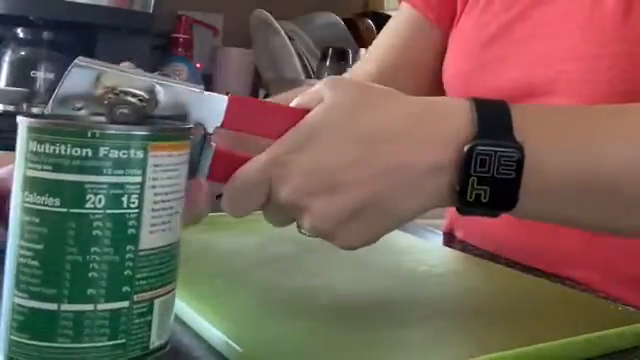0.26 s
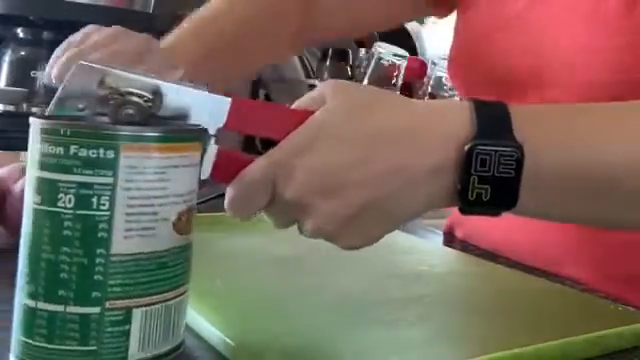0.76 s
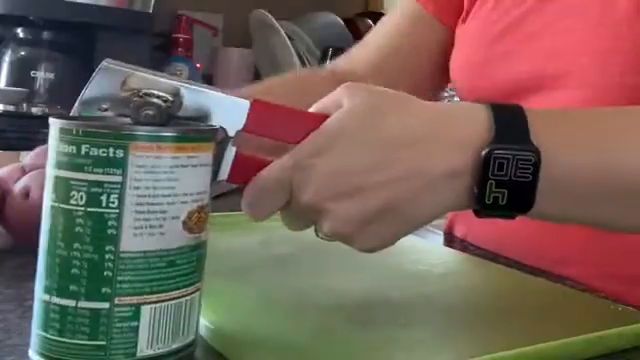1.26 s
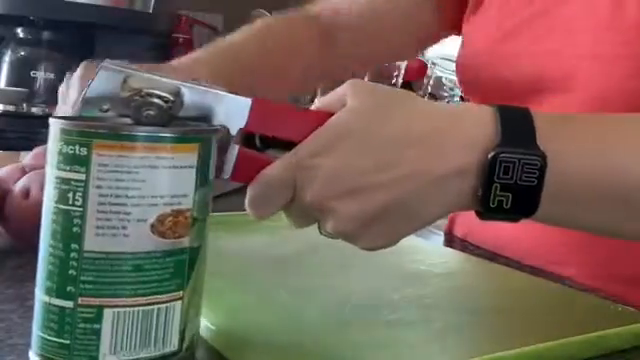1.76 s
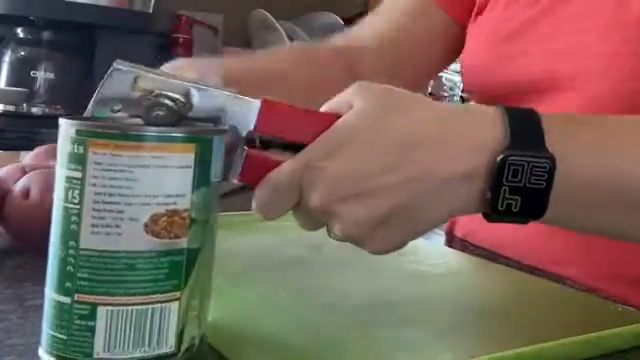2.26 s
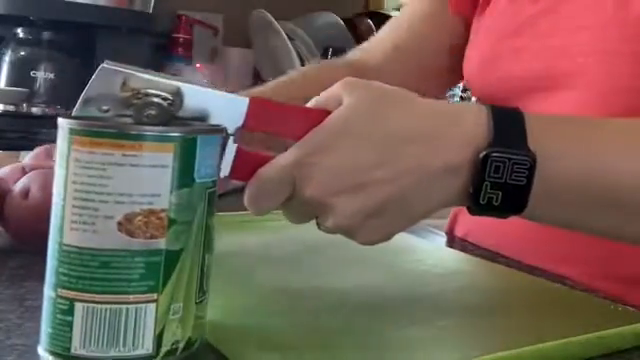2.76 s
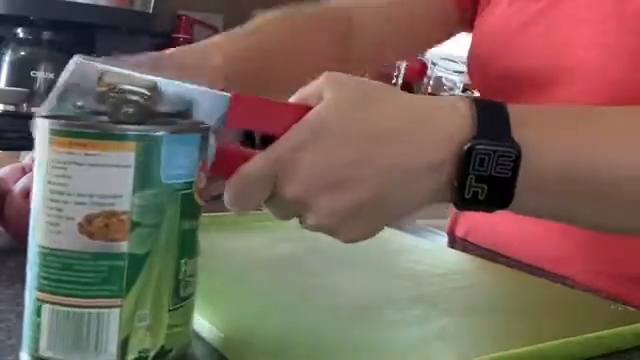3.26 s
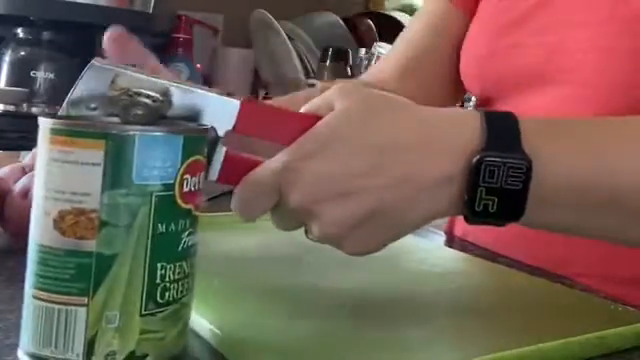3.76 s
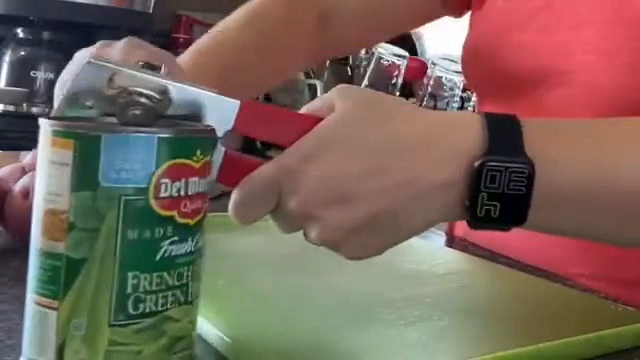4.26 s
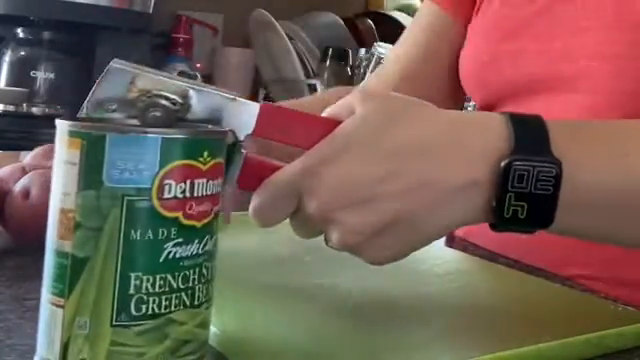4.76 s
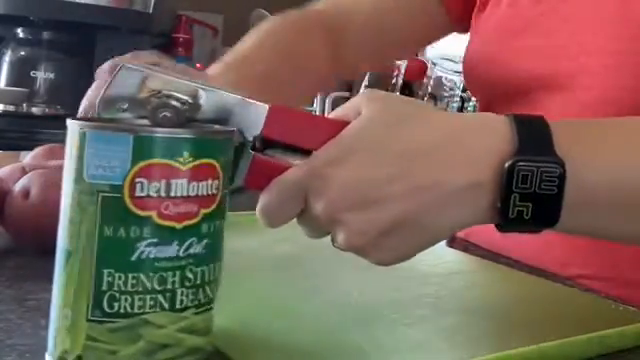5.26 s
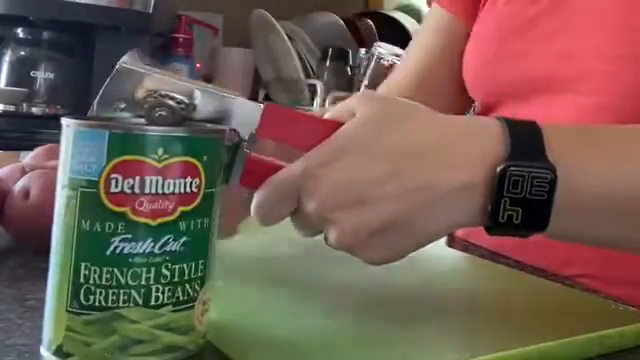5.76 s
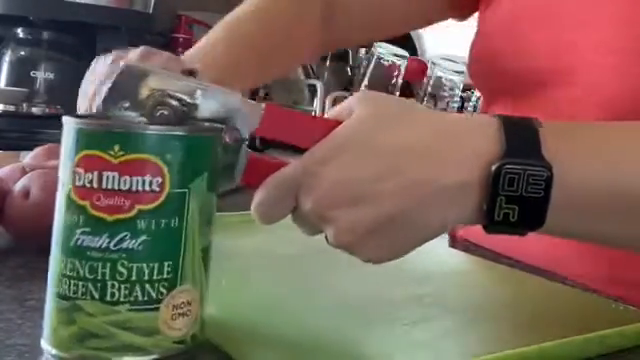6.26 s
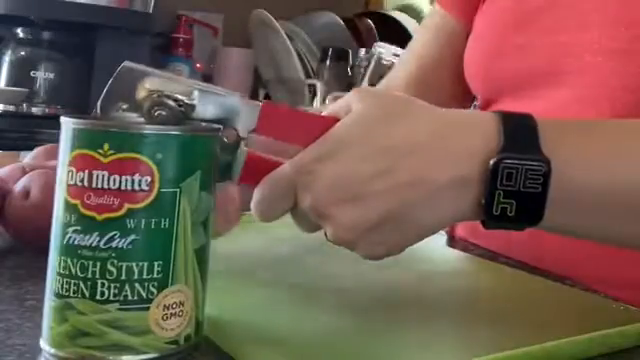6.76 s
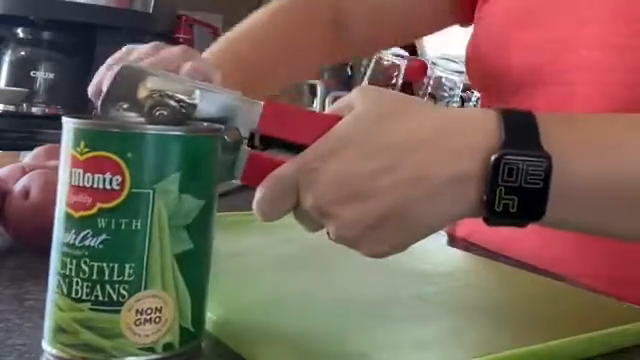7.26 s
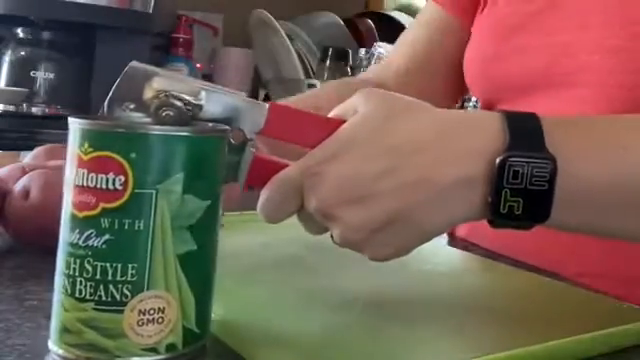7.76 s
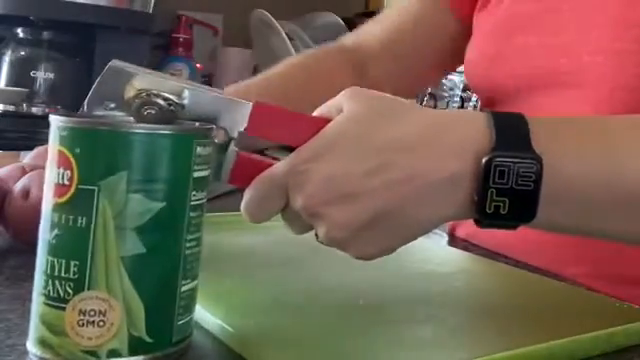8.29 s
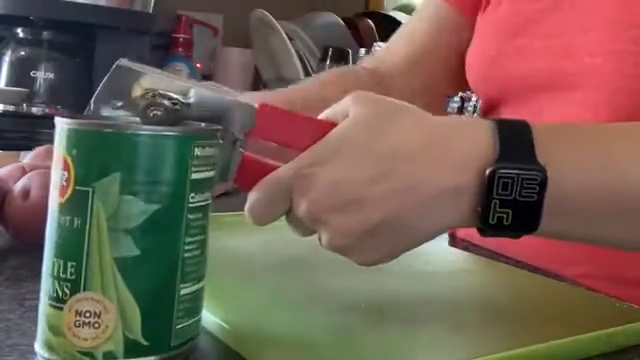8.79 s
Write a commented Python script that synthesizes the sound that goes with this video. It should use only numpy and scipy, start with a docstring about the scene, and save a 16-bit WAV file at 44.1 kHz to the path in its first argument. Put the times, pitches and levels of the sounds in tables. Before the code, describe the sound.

Close-up of a manual can opener working a tin's rim: gritty scraping, clustered tooth ticks, knocks on the counter, quiet kitchen hum behind.

```python
"""A fridge hums and a hand-held opener rubs lightly on a full steel can, standing on a kitchen counter by a phone.
Then each wrist stroke scrapes the rim: noisy slips keep the modes of counter, can and opener ringing.
The rocking can thuds into the counter, feed-wheel teeth tick through the can's modes, and the lid snaps
as short noise bursts. Decaying noise gives the room; the phone's two ports hear the can by different paths."""
import sys
import numpy as np
from scipy import signal
from scipy.fft import rfft, irfft
from scipy.io import wavfile
from scipy.ndimage import uniform_filter1d

SR = 44100
rng = np.random.default_rng(int(sys.argv[2]) if len(sys.argv) > 2 else 0)


def wrap_up_sound(samples):
    """Save the sound to the file named by the first command line argument, as 16-bit audio."""
    columns = np.atleast_2d(samples).T
    # keep every value between -1 and 1, then stretch to whole-number steps
    tamed = np.clip(columns, -1, 1)
    steps = np.round(tamed * 32767).astype(np.int16)
    wavfile.write(sys.argv[1], SR, steps)


N = 398223
FREQ = np.fft.rfftfreq(N, 1 / SR)

# Modes share three columns: pitch_hz [Hz], level_db [dB, relative], t60_s [s, before any damping by the grip]
# bending modes of the counter top
COUNTER_MODES = [(128.1, -2, 0.071), (171.4, -0.5, 0.089), (202.4, 0.5, 0.067), (240.9, -3, 0.083),
                 (290, -8, 0.043), (365, -12, 0.068), (424, -7, 0.1), (479.7, 1.5, 0.054),
                 (540, -6.5, 0.022)]
# the counter's deep, slow shake
SHAKE_MODES = [(51.7, 4.5, 0.55), (60.2, 10.5, 0.24), (74.4, -13, 0.11)]
# the full can's wall and rim
CAN_MODES = [(653.4, 7, 0.043), (750.4, 5.5, 0.039), (850, -1.5, 0.039), (926, 4, 0.024),
             (1164.4, 0, 0.058), (1324, -3, 0.04), (1460, -7, 0.03), (1580, -8.5, 0.036),
             (1613, 1.5, 0.088), (1737, -4.5, 0.14), (1870, -9, 0.095), (2060, -13.5, 0.063),
             (2330, -12.5, .05), (2820, -20, 0.088), (3030, -16.5, 0.15)]
# the opener's steel
OPENER_MODES = [(3260, 0.5, 0.09), (3310, -2.5, 0.1), (3380, -3, 0.08), (3680, -1.5, 0.057),
                (3930, -3.5, .035), (4300, -4, .03), (5000, -2, .06), (6050, -5, .05), (8200, -1, 0.052),
                (9600, -3, .04)]


def undb(db):
    """Decibels to amplitude gain."""
    return 10 ** (np.asarray(db) / 20)


def unit(x):
    """Scales a signal to rms 1."""
    return x / np.sqrt(np.mean(x ** 2))


def shaped(x, table):
    """Colours a signal by (Hz, dB) points; rms 1."""
    hz, db = np.transpose(table)
    gain = undb(np.interp(np.log(FREQ + 1), np.log(hz), db))
    return unit(irfft(rfft(x) * gain, N))


def band(x, lo_hz, hi_hz, order=2):
    """Keeps the sound between two frequencies."""
    edges = [lo_hz, min(hi_hz, .45 * SR)]
    return signal.sosfilt(signal.butter(order, edges, "band", fs=SR, output="sos"), x)


def walk(rate):
    """Random levels held 1 / rate s and smoothed twice; rms near 1."""
    k = int(SR / rate)
    steps = np.repeat(rng.standard_normal(N // k + 1), k)
    return unit(uniform_filter1d(uniform_filter1d(steps, k), k)[:N])


def ring(modes, centre_hz, octaves, scatter_db, rise_cycles):
    """One blow: the modes near the struck spot's centre speak loudest, low ones build later; peak 1."""
    hz, db, t60 = (c[:, None] for c in np.transpose(modes))
    t = np.arange(int(min(t60.max(), 1 / 3) * SR)) / SR
    chance = rng.standard_normal((len(modes), 3))
    distance = np.log2(hz / centre_hz) / octaves
    gain = undb(db + scatter_db * chance[:, :1] - 6 * distance ** 2)
    turn = 2 * np.pi * hz * (1 + .007 * chance[:, 1:2]) * t
    # each mode has a close, weaker twin, so the ring beats roughly
    pair = np.sin(turn) + .6 * np.sin(turn * (1 + .02 * chance[:, 2:]))
    rise = (1 - np.exp(-t * hz / rise_cycles)) ** 2
    wave = (gain * pair * undb(-60 * t / t60) * rise).sum(axis=0)
    return wave / np.abs(wave).max()


def crack(lo_hz, hi_hz, t60):
    """A short burst of noise at the contact; peak 1."""
    t = np.arange(SR // 20) / SR
    burst = rng.standard_normal(len(t)) * undb(-60 * t / t60) * (1 - np.exp(-t / 0.00072))
    wave = band(burst, lo_hz, hi_hz, order=3)
    return wave / np.abs(wave).max()


def add(out, s, wave):
    """Lays a wave into the track at s seconds."""
    i = int(s * SR)
    out[i:i + len(wave)] += wave[:len(out) - i]


def rubbed(modes, rate, spread_db, grain_db, push_s, damp):
    """Uneven little slips, over a bed of noise, keep the modes ringing, damped by the grip; rms 1."""
    struck = rng.random(N) < rate / SR
    strength = undb(spread_db * np.clip(rng.standard_normal(N), -2, 2))
    slips = struck * strength * np.sign(rng.standard_normal(N))
    push = undb(grain_db) * unit(slips) + rng.standard_normal(N)
    drive = uniform_filter1d(push, 1 + int(push_s * SR))
    out = 0
    for hz, db, t60 in modes:
        r = undb(-60 * damp / (t60 * SR))
        angle = 2 * np.pi * hz / SR
        ringing = signal.lfilter([1], [1, -2 * r * np.cos(angle), r * r], drive)
        # the rubbed spot travels, so each mode swells and fades on its own
        out = out + undb(db + 2.3 * walk(6)) * np.sin(angle) * ringing
    return unit(out)


def background():
    """Slightly wavering fridge hum and a thin can ring, over dull air noise spread between the two ports."""
    # steady faint tones: motor hum of the fridge, plus the can's thin 1610 Hz ring;
    # columns: pitch_hz [Hz], level_db [dB rms, before the wavering]
    steady_tones = [(59.5, -50), (179, -54.5), (215, -56.5), (240, -63.5), (297, -57), (324, -71),
                    (349, -74.5), (431, -74), (645, -79), (1610, -90.5), (4050, -99)]
    # colour of the room's air noise; columns: pitch_hz [Hz], level_db [dB per Hz, relative]
    air_colour = [(18, -27.5), (30, -13.5), (68, -9.5), (133, -14), (181, -13.5), (304, -3), (786, -35.5),
                  (2140, -66), (9520, -60.5), (14000, -79.5)]
    air_db = -56.5
    t = np.arange(N) / SR
    tones = 0
    for hz, db in steady_tones:
        level = np.sqrt(2) * undb(db + 0.38 * walk(6.5))
        tones = tones + level * np.sin(2 * np.pi * hz * t + 0.8 * walk(2.3))
    mid, side = (shaped(rng.standard_normal(N), air_colour) for _ in range(2))
    return tones + undb(air_db) * (mid + 0.93 * side * np.array([[1], [-1]]))


def effort(column):
    """Gain of one rubbed layer: each stroke bites, swells to its hardest moment, eases and lets go."""
    # wrist strokes and short regrips; columns: start_s [s], hardest_s [s], end_s [s], then levels at the
    # hardest moment: rumble_db [dB, counter], scrape_db [dB, rim], hiss_db [dB, cutter]
    strokes = [(0.01, .03, 0.11, -47, -61.5, -90), (0.151, 0.193, 0.24, -33, -55.5, -75),
               (0.26, 0.5, 0.67, -35, -47, -62), (0.72, 0.798, 0.87, -46, -54.5, -68.5),
               (0.971, 1.055, 1.26, -40.5, -57, -77.5), (1.178, 1.426, 1.504, -34.5, -44, -60),
               (1.52, 1.56, 1.8, -55, -65, -92.5), (1.837, 1.886, 2.03, -44, -60.5, -82.5),
               (2.078, 2.332, 2.5, -36, -47.5, -63), (2.497, 2.547, 2.86, -49.5, -58, -77.5),
               (2.832, 2.852, 2.99, -46.5, -57.5, -74.5), (3.014, 3.178, 3.43, -35.5, -47, -60),
               (3.39, 3.41, 3.7, -40, -55, -75), (3.763, 3.845, 4.01, -40, -53, -70),
               (3.923, 4.104, 4.34, -37.5, -48.5, -63), (4.265, 4.384, 4.42, -38, -51, -67.5),
               (4.928, 5.044, 5.24, -36, -49, -64), (5.086, 5.22, 5.32, -33, -45.5, -59),
               (5.3, 5.32, 5.5, -50, -59.5, -78), (5.85, 5.878, 6.2, -34, -50, -65.5),
               (5.97, 6.027, 6.365, -37.5, -49.5, -60.5), (6.385, 6.44, 6.5, -41.5, -57, -69),
               (6.692, 6.7, 6.75, -45, -58, -77), (6.765, 7.006, 7.18, -32, -49.5, -61.5),
               (7.517, 7.57, 7.62, -43, -59, -78.5), (7.635, 7.693, 7.73, -45, -57.5, -72.5),
               (7.713, 7.764, 7.98, -38.5, -46, -58.5), (7.815, 7.91, 8.14, -41, -46.5, -64),
               (8.46, 8.47, 8.56, -44.5, -56.5, -71.5), (8.573, 8.716, 9.15, -43, -54.5, -69),
               (8.96, 9.031, 9.8, -39, -53, -75)]
    grip_s, let_go_s = 0.05, 0.07
    # rumble, scrape and hiss while the hand only holds the opener
    rest_db = (-54.5, -76.5, -89.5)[column]
    # the same three at a stroke's start and end, relative to its hardest moment
    bite_db, ease_db = (-9, -7, -10.5)[column], (-9, -12.5, -14)[column]
    t = np.arange(N) / SR
    gain = np.full(N, undb(rest_db))
    for start, hardest, end, *db in strokes:
        times = [start - grip_s, start, hardest, end, end + let_go_s]
        shape_db = np.interp(t, times, [-30, bite_db, 0, ease_db, -30])
        gripping = (t > times[0]) * (t < times[-1])
        gain = np.maximum(gain, undb(db[column] + shape_db) * gripping)
    return gain


def turning():
    """Wrist effort rubs counter, can and cutter without pause, keeping their modes ringing under noise."""
    # colour of the cutter's hiss; columns: pitch_hz [Hz], level_db [dB per Hz, relative]
    hiss_colour = [(1500, -24), (2500, -3.5), (3500, -11.5), (5000, -7), (6200, -9.5), (7400, -17.5),
                   (8100, -6), (9000, -10), (9800, -8.5), (11000, -12), (13000, -7), (14500, -30.5)]
    sway_s, sway_db, sway_rest_db = 0.17, -4.5, -58.5
    firm_db, brighten = -46.5, 0.34  # scrape level of reference brightness; how fast the highs follow effort
    rumble, scrape, hiss = (effort(column) for column in range(3))

    # the counter's sway follows a smoothed rumble
    sway = undb(sway_db) * uniform_filter1d(rumble, int(sway_s * SR)) + undb(sway_rest_db)
    shaking = sway * rubbed(SHAKE_MODES, 30, spread_db=3, grain_db=-3, push_s=.004, damp=1)
    counter = rubbed(COUNTER_MODES, 70, spread_db=6.0, grain_db=1.0, push_s=0.0011, damp=1.3)
    rumbling = rumble * undb(2 * walk(25)) * counter

    grit = undb(2.62 * walk(44) + 1.8 * walk(250))  # the cutter catches and tears unevenly
    burrs = unit(band(rng.standard_normal(N) * undb(5 * walk(400)), 460, 2700))
    low = [m for m in CAN_MODES if m[0] < 1400]
    high = [m for m in CAN_MODES if m[0] >= 1400]
    low_can = rubbed(low, 220, spread_db=4.5, grain_db=11.0, push_s=.0002, damp=1.4)
    high_can = rubbed(high, 350, spread_db=5.0, grain_db=11, push_s=.0001, damp=1.0)
    # a light scrape is duller
    bright = undb(-6) * (scrape / undb(firm_db)) ** brighten
    scraping = scrape * grit * (low_can + bright * high_can + undb(-11.5) * burrs)

    # the opener's arm rattles more once the lid hangs loose, from 8.3 s
    rattle_db = np.where(np.arange(N) / SR > 8.3, 0, -5.5)
    arm = rubbed(OPENER_MODES, 400, spread_db=4, grain_db=4, push_s=.00002, damp=2)
    steel = shaped(rng.standard_normal(N), hiss_colour) + undb(rattle_db) * arm
    hissing = hiss * np.sqrt(grit) * undb(2.0 * walk(60)) * steel
    return shaking + rumbling + scraping + hissing


def thuds():
    """The rocking can strikes the counter: a dry contact, then bending waves and a late, deep shake."""
    # blows on the counter; columns: start_s [s], level_db [dB peak of the main blow], pitch_hz [Hz, centre]
    counter_blows = [(.184, -21.5, 164), (.301, -23, 133), (0.511, -25.5, 189), (0.603, -12, 171),
                     (.834, -31.5, 186), (1.041, -23, 136), (1.352, -18.5, 196.6), (1.394, -16.5, 208.9),
                     (2.177, -24, 237), (2.308, -19.5, 150), (2.411, -17, 134), (2.573, -23.5, 194),
                     (2.642, -30, 133.9), (2.804, -29, 198), (3.091, -24.5, 273), (3.123, -21.5, 199),
                     (3.15, -20.5, 173), (3.382, -10, 161.5), (3.66, -33.5, 180), (3.73, -26.5, 153),
                     (3.913, -31, 194), (3.944, -24, 170), (4.026, -21, 177), (4.075, -25, 190),
                     (4.14, -22, 205), (4.284, -12.5, 258), (4.816, -23, 172.1), (4.963, -16.5, 149),
                     (5.194, -20, 180), (5.777, -22, 271), (5.851, -16, 168), (5.952, -27, 136),
                     (5.998, -24.5, 144), (6.228, -26, 188), (6.381, -18.5, 197), (6.682, -30, 230),
                     (6.769, -18.5, 249.9), (6.862, -20.5, 257), (6.909, -21.5, 184.4), (6.948, -19, 250),
                     (7.007, -16.5, 201), (7.054, -17.5, 203), (7.097, -17.5, 228), (7.516, -26.5, 131),
                     (7.63, -28.5, 177), (7.73, -27, 250), (7.978, -27.5, 134.4), (8.432, -29.5, 146),
                     (8.577, -14, 251)]
    thump_t60_s = 0.031  # the dead blow, as strong as the counter's ring
    contact_db, deep_db = -23, -18  # relative to the main blow
    out = np.zeros(N)
    for s, db, hz in counter_blows:
        blow = ring(COUNTER_MODES, hz, octaves=0.56, scatter_db=4.5, rise_cycles=0.67)
        thump = ring([(hz, 0, thump_t60_s)], hz, octaves=1, scatter_db=0, rise_cycles=.3)
        add(blow, .001, thump)
        shake = ring(SHAKE_MODES, 60, octaves=1.5, scatter_db=3, rise_cycles=.4)
        add(out, s + 0.0019, undb(db) * blow / np.abs(blow).max())
        add(out, s, undb(db + contact_db) * crack(500, 2500, 0.037))
        add(out, s + .006, undb(db + deep_db) * shake)
    return out


def ticks():
    """Each tooth slips off the rim, rings can, lid and opener and spits a little treble."""
    # feed-wheel teeth; columns: start_s [s], level_db [dB, reference for body parts], pitch_hz [Hz, centre],
    # treble_db [dB peak of the highest burst]
    teeth = [(.294, -35, 774, -50.5), (.371, -30.5, 920, -45.5), (.424, -30.5, 600, -44),
             (.48, -24.5, 650, -47), (0.528, -25.5, 690, -42.5), (.582, -28.5, 770, -71),
             (0.604, -19, 870, -46.5), (1.054, -33.5, 726, -77), (1.194, -32, 860, -43.5),
             (1.269, -28.5, 852, -38.5), (1.327, -29.5, 1210, -36), (1.384, -26, 731, -37.5),
             (1.41, -26.5, 763, -48), (1.445, -28.5, 880, -43), (2.081, -36.5, 770, -51.5),
             (2.138, -36.5, 810, -50), (2.167, -33.5, 870, -47.5), (2.231, -37.5, 870, -46),
             (2.282, -31.5, 850, -50), (2.301, -27.5, 680, -40), (2.389, -31.5, 860, -51.5),
             (2.41, -20, 810, -44), (3.062, -31, 850, -57.5), (3.114, -25, 1210, -38),
             (3.157, -21.5, 910, -43.5), (3.205, -25, 1170, -36.5), (3.26, -25.5, 930, -45.5),
             (3.384, -12, 670, -37.5), (3.73, -47, 660, -77), (3.8, -47.5, 860, -66),
             (3.852, -41.5, 1031, -57), (3.942, -36, 730, -62), (4.073, -41.5, 785, -57.5),
             (4.093, -34.5, 870, -53.5), (4.144, -37, 795, -51.5), (4.283, -21.5, 1168, -46),
             (4.82, -34.5, 513, -66), (4.962, -30, 665, -51.5), (5.029, -30.5, 960, -40.5),
             (5.079, -37, 620, -53), (5.092, -29, 882, -38.5), (5.144, -29.5, 1195, -36.5),
             (5.192, -23, 1187, -34), (5.227, -26, 635, -34), (5.777, -28, 632, -75.5),
             (5.852, -21, 810, -35), (6.03, -27.5, 1185, -39.5), (6.068, -28, 1235, -61.5),
             (6.094, -47, 1170, -48), (6.24, -35, 875, -55), (6.38, -30, 700, -62.5),
             (6.43, -32.5, 1306, -41.5), (6.684, -40.5, 690, -67), (6.768, -33.5, 657, -53),
             (6.799, -25.5, 1307, -57.5), (6.851, -33.5, 690, -46.5), (6.908, -25.5, 1005, -34.5),
             (6.955, -24.5, 684, -29), (7.004, -19, 695, -34.5), (7.047, -23.5, 1098, -42),
             (7.098, -18.5, 830, -42), (7.714, -28, 1320, -41), (7.75, -29.5, 1543, -39),
             (7.893, -40, 1189, -48.5), (7.957, -43, 915, -44), (8.46, -41.5, 1610, -46),
             (8.576, -28, 820, -55), (8.656, -35, 1080, -50.5), (8.698, -34.5, 1640, -41),
             (8.756, -33.5, 990, -44), (8.848, -31.5, 770, -40), (8.997, -35, 1130, -47),
             (9.025, -30.5, 1320, -40.5)]
    # higher-centred ticks carry more of the lid's clear tone and less noise
    lid_hz, lid_tone_db, crack_db = (870, 1240), (-17.5, -4.5), (-6, -15)
    lid_t60_s = 0.043
    free_s, held_db = (5.3, 6.0), -4  # the lid's tone is held down until it is cut half free
    can_db = -3  # can ring, relative to level_db
    grind_db, ping_db = 2.5, -13.5  # low treble and opener ring, relative to treble_db
    out = np.zeros(N)
    for s, db, hz, treble_db in teeth:
        lid_db = np.interp(hz, lid_hz, lid_tone_db) + np.interp(s, free_s, [held_db, 0])
        # a stronger lid tone leaves the can a weaker ring
        can_level_db = db + can_db - 0.3 * (lid_db - lid_tone_db[0])
        can = ring(CAN_MODES, hz, octaves=0.46, scatter_db=2.5, rise_cycles=0.45)
        lid = ring([(hz, 0, lid_t60_s)], hz, octaves=1, scatter_db=0, rise_cycles=.7)
        opener = ring(OPENER_MODES, 3600, octaves=0.45, scatter_db=1.5, rise_cycles=0.19)
        noise_db = db + np.interp(hz, lid_hz, crack_db)
        add(out, s, undb(noise_db) * crack(hz / 2.8, hz * 2.43, 0.035))
        add(out, s, undb(can_level_db) * can)
        add(out, s, undb(db + lid_db) * lid)
        add(out, s, undb(treble_db + grind_db) * crack(1900, 4600, 0.012))
        add(out, s, undb(treble_db + ping_db) * opener)
        add(out, s, undb(treble_db) * crack(4200, 20000, 0.0091))
    return out


def snaps():
    """The lid's edge snaps: bright, very short cracks of thin steel."""
    # columns: start_s [s], level_db [dB peak], pitch_hz [Hz, centre of the noise band]
    edge_snaps = [(1.3678, -15.5, 8000), (4.705, -47, 9100), (4.807, -47.5, 9640), (4.867, -64, 9300),
                  (4.933, -38, 8530), (4.942, -30.5, 7700), (5.5563, -43, 4300), (5.884, -49, 4990),
                  (5.9207, -47, 8420), (6.029, -29.5, 5500), (6.2062, -31.5, 7500), (6.288, -33, 7560),
                  (7.6892, -47, 5050), (7.7901, -41, 5270), (8.745, -33.5, 4390), (8.954, -52, 8340)]
    out = np.zeros(N)
    for s, db, hz in edge_snaps:
        add(out, s, undb(db) * crack(hz / 2.2, hz * 1.7, 0.0065))
    return out


def arm_pings():
    """The opener's loose arm knocks and rings out, its modes roughened by chatter against the rim."""
    # columns: start_s [s], level_db [dB peak before the chatter], pitch_hz [Hz, centre]
    arm_knocks = [(6.095, -51, 3420), (6.433, -53, 3540), (6.8, -49, 3600), (7.716, -47, 3570),
                  (7.752, -41.5, 3530), (8.463, -44, 3270), (8.7, -49, 3500), (8.757, -52, 3280),
                  (8.462, -58, 5097), (8.85, -55, 3280), (8.999, -46.5, 3300)]
    out = np.zeros(N)
    for s, db, hz in arm_knocks:
        wave = ring(OPENER_MODES, hz, octaves=0.1, scatter_db=1.0, rise_cycles=3.7)
        chatter = uniform_filter1d(rng.standard_normal(len(wave)), SR // 250)
        add(out, s, undb(db) * wave * undb(4 * unit(chatter)))
    return out


def kitchen(x):
    """Room echo: decaying noise for each band and port; the bands around 2 kHz linger longest."""
    # columns: pitch_hz [Hz, band centre], t60_s [s], level_db [dB, relative]
    room_bands = [(91.5, .1, -26), (388, .2, -18.5), (928, 0.23, -17), (1660, 0.39, -17.5),
                  (2600, 0.42, -16), (4550, 0.14, -16), (9000, 0.15, -15)]
    t = np.arange(int(.7 * SR)) / SR
    tail = 0
    for hz, t60, db in room_bands:
        noise = band(rng.standard_normal((2, len(t))), hz / 1.5, hz * 1.5, order=3)
        tail = tail + undb(db - 60 * t / t60) * noise / np.sqrt(t60 * hz)
    tail = tail * (1 - np.exp(-t / 0.0015)) * undb(10.5)
    return signal.fftconvolve(x[None], tail, axes=1)[:, :N]


def scene():
    """Can and opener reach two ports with unequal phase and level, over the room's echo and background."""
    # columns: pitch_hz [Hz], lead_rad [radians by which the left port leads]
    port_lead = [(0, 0.5), (330, -0.12), (540, 3.5), (640, 5), (900, 6.5), (1250, 6.5), (1500, 7.5),
                 (2700, 7), (4000, 7.5), (5300, 7.5), (5800, 7), (8000, 4.5), (10500, 7), (16000, 9.5)]
    can = turning() + thuds() + ticks() + snaps() + arm_pings()
    hz, lead = np.transpose(port_lead)
    # the two ports hear the can by different paths round the phone
    right = irfft(rfft(can) * np.exp(-1j * np.interp(FREQ, hz, lead)), N)
    direct = np.array([undb(0.65) * can, undb(1.36) * right])
    return direct + kitchen(can) + background()


def record(dry):
    """The phone drops the deepest bass, below 40 Hz, and cuts the top above 16.4 kHz."""
    dry = signal.sosfilt(signal.butter(6, 40, "high", fs=SR, output="sos"), dry)
    return signal.sosfilt(signal.ellip(8, .2, 70, 16400, fs=SR, output="sos"), dry)


dry = scene()
out = record(dry)
wrap_up_sound(out)
```